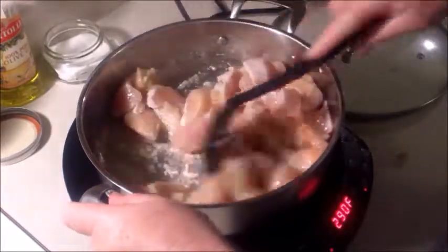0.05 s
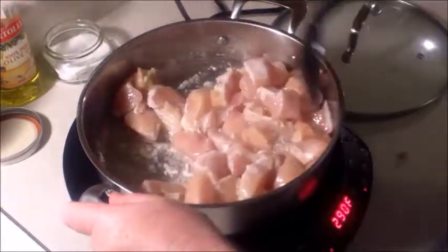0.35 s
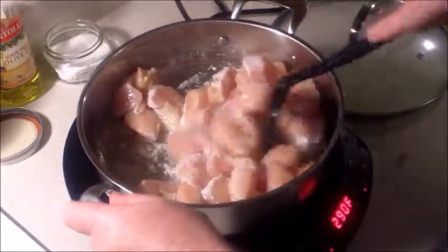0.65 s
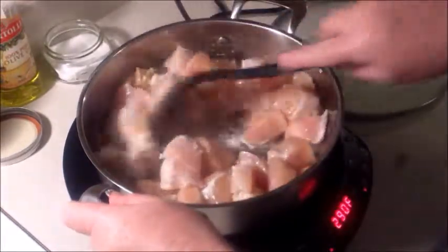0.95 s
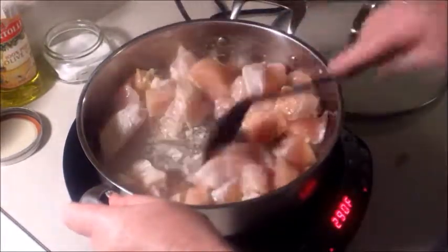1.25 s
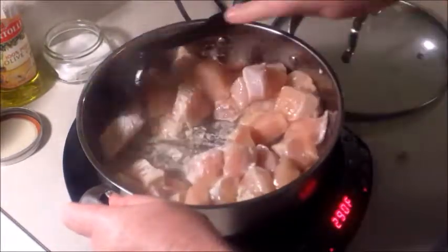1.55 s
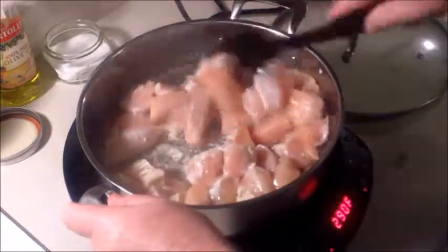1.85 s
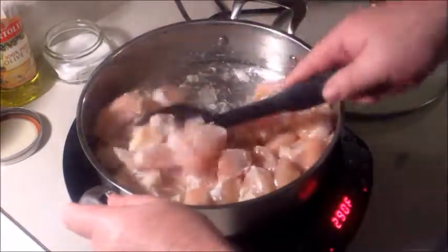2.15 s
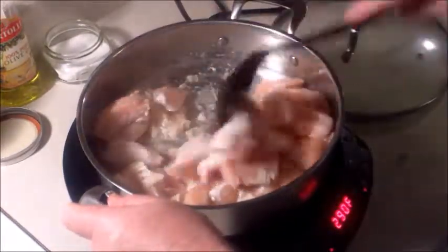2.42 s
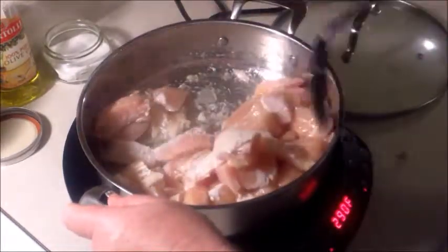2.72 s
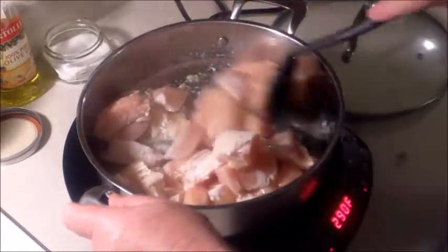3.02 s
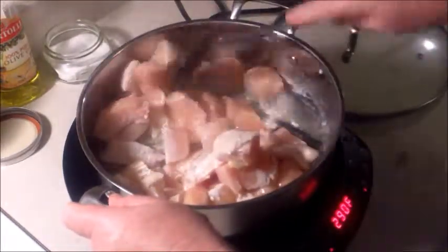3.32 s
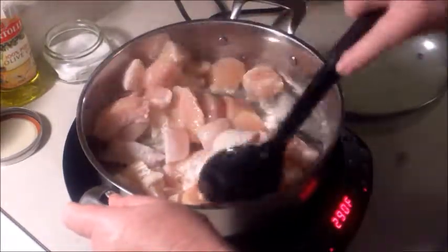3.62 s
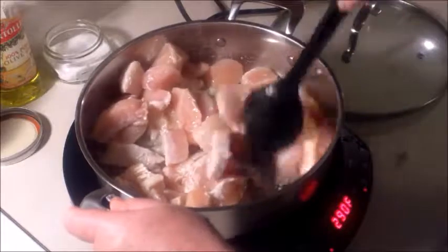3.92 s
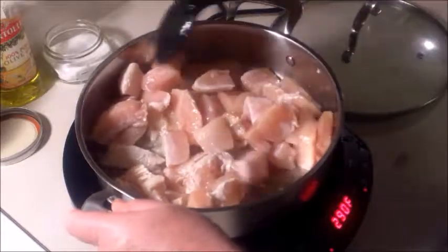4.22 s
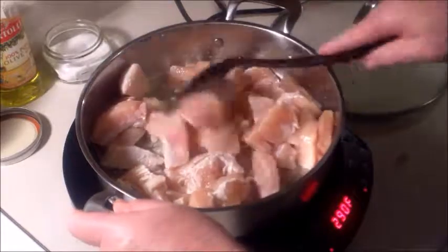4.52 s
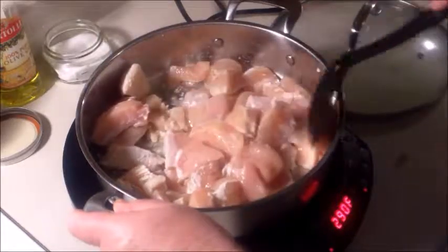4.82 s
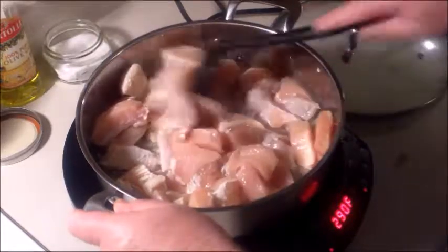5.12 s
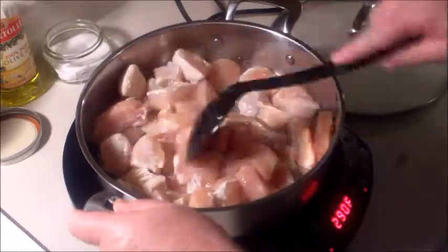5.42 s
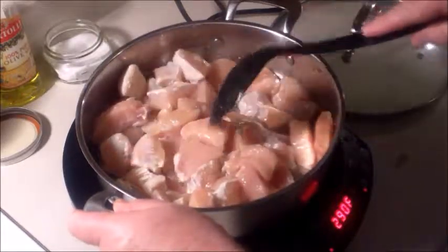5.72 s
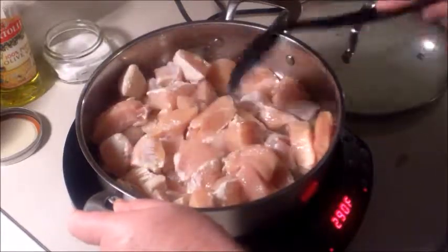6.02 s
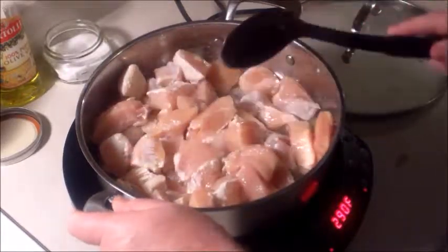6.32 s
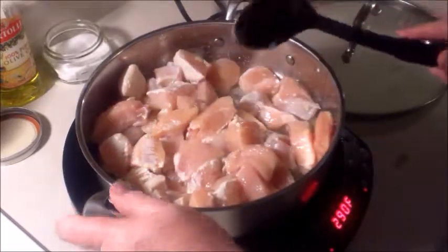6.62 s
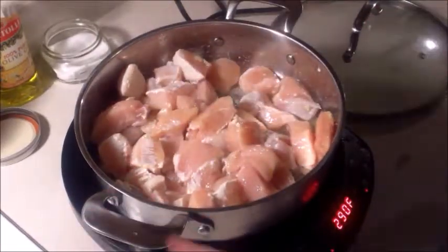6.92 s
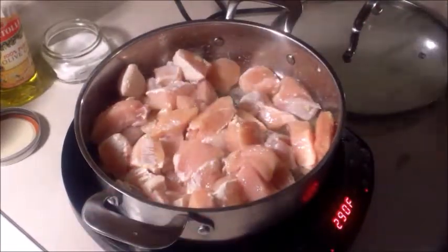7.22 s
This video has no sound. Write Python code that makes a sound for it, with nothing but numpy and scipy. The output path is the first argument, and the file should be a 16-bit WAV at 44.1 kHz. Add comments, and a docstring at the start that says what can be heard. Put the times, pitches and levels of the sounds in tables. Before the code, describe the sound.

Close to a pan in a kitchen, hot oil hisses and crackles around pieces of chicken. Repeated strokes of a plastic spoon make the frying flare and squelch, with soft thuds of meat, occasional taps on the metal and a few sharp spits. A cooktop fan hums faintly below. The sound turns briefly thin and watery at moments, and the sizzle settles a little once the stirring ends.

```python
"""A close, crackling sizzle: diced chicken fries in a steel pan while a plastic spoon turns it over.
Steam bubbles burst in the hot oil and throw a fine spray; each stroke brings wet meat onto the metal,
which sputters. The induction hob's fan and hum lie below, and the kitchen adds faint echoes.
One microphone by the pan, mono; for brief moments the sound turns thin and watery."""
import sys
import numpy as np
from scipy import signal
from scipy.fft import rfft, irfft, next_fast_len
from scipy.io import wavfile
from scipy.ndimage import uniform_filter1d

SR = 44100
rng = np.random.default_rng(int(sys.argv[2]) if len(sys.argv) > 2 else 0)


def unload_audio(sound):
    """Save the sound as a 16-bit wav file, at the path given as the first command line argument."""
    columns = np.transpose(np.atleast_2d(sound))
    # keep every value between -1 and 1, then stretch to whole-number steps
    steps = np.round(np.clip(columns, -1, 1) * 32767)
    wavfile.write(sys.argv[1], SR, steps.astype(np.int16))


N = 320151


def from_db(db):
    """Decibels to gain."""
    return 10 ** (np.asarray(db) / 20)


def rms_one(x):
    """Scale to an rms of 1."""
    return x / np.sqrt(np.mean(x ** 2) + 1e-20)


def in_time(rows):
    """Turn rows of (seconds, values..) into one curve a value, sample by sample."""
    times, *columns = np.transpose(rows)
    return [np.interp(np.arange(N) / SR, times, column) for column in columns]


def drift(rate_hz, step=40, settle=2000):
    """A slow random wander with an rms of about 1."""
    pole = np.exp(-2 * np.pi * rate_hz * step / SR)
    noise = rng.standard_normal(N // step + settle + 2)
    slow = signal.lfilter([1], [1, -2 * pole, pole * pole], noise)[settle:]
    return np.interp(np.arange(N) / step, np.arange(len(slow)), rms_one(slow))


def coloured(x, spectrum):
    """Shape x by rows of (Hz, relative dB); rms 1."""
    size = 2 * next_fast_len(N)
    hz, db = np.transpose(spectrum)
    bin_hz = np.fft.rfftfreq(size, 1 / SR)
    gain = from_db(np.interp(np.log(bin_hz + 1), np.log(hz), db))
    cepstrum = irfft(np.log(gain))[:size // 2]
    cepstrum[1:] *= 2  # minimum phase: nothing rings ahead of a click
    response = np.exp(rfft(cepstrum, size))
    return rms_one(irfft(rfft(x, size) * response)[:N])


def ring(clicks, hz, t60):
    """A unit click starts a sine of height 1 that falls 60 dB in t60 seconds."""
    radius, angle = from_db(-60 / (t60 * SR)), 2 * np.pi * hz / SR
    feedback = [1, -2 * radius * np.cos(angle), radius * radius]
    return signal.lfilter([0, np.sin(angle)], feedback, clicks + 1e-18)


def resonance(x, hz, width_hz, block=256):
    """A steep-sided resonance whose centre may move from block to block; rms 1."""
    radius = np.exp(-np.pi * width_hz / SR)
    cosine = np.cos(2 * np.pi * hz / SR) * np.ones(N)
    out, state = np.zeros(N), np.zeros((2, 2))
    for i in range(0, N, block):
        section = [1, 0, -1, 1, -2 * radius * cosine[i], radius * radius]
        out[i:i + block], state = signal.sosfilt([section, section], x[i:i + block], zi=state)
    return rms_one(out)


def strikes(rows):
    """One click for each (seconds, dB)."""
    out = np.zeros(N)
    for start, db in rows:
        out[round(start * SR)] = from_db(db)
    return out


def bursts(per_s, spread_db, clump_db):
    """Random clicks, many small and a few large; their rate wanders around per_s, so they clump."""
    born = rng.random(N) < per_s * from_db(clump_db * drift(rate_hz=25)) / SR
    sizes = from_db(spread_db * np.minimum(rng.exponential(1, N), 5))
    return born * sizes * rng.choice([-1, 1], N)


def kitchen(x, echo_db=-16, t60=0.4, count=120):
    """Counter, cupboards and walls send faint early echoes back to the microphone."""
    delays = rng.uniform(0.0028, .07, count)
    echoes = np.zeros(SR // 5)
    echoes[(delays * SR).astype(int)] = rng.choice([-1, 1], count) * from_db(-60 * delays / t60)
    return x + from_db(echo_db) * signal.fftconvolve(x, echoes / np.linalg.norm(echoes))[:N]


def hob(air_db=-48, waver_hz=2.0, waver_db=2):
    """Under the pan the cooling fan blows through the housing; motor and mains add wavering tones."""
    # Rush of the fan. Each row: frequency in Hz, relative level in dB.
    fan_colour = [(15, -6), (27, 6.5), (36, -3.5), (55, -7), (100, -12), (160, -10.5), (210, -5.5),
                  (300, -5.5), (470, -11.5), (550, -8), (640, -11.5), (710, -7), (900, -9.5), (1170, -6),
                  (2000, -26.5)]
    # Motor and mains hum. Each row: frequency in Hz, rms level in dB, both before the waver.
    tones = [(59.2, -59.5), (120, -71), (290.7, -58.5), (412, -60), (705.2, -65), (1163, -59.5),
             (1384, -73)]
    out = from_db(air_db) * coloured(rng.standard_normal(N), fan_colour)
    for hz, db in tones:
        phase = 2 * np.pi * np.cumsum(hz + waver_hz * drift(rate_hz=2.74)) / SR
        out += np.sqrt(2) * from_db(db + waver_db * drift(rate_hz=6.1)) * np.sin(phase)
    return out


def drumming(swing_db, rest_db=-51, follows_boil=.5, flop_half_s=0.031):
    """Soft thuds of meat and vapour sound the pan bottom's low note, swelling where a piece flops over."""
    # Meat landing on the pan bottom. Each row: time in seconds, rms level at its height in dB.
    flops = [(.29, -41.5), (.56, -43.5), (1.945, -42.5), (2.02, -43), (2.95, -45), (3.09, -44), (3.6, -45),
             (5.27, -47), (5.76, -45.5), (6.36, -45.5)]
    t = np.arange(N) / SR
    flop_power = sum((from_db(db) * np.exp(-((t - at) / flop_half_s) ** 2)) ** 2 for at, db in flops)
    level = np.sqrt(from_db(rest_db + follows_boil * swing_db) ** 2 + flop_power)
    thuds = bursts(per_s=760, spread_db=2.0, clump_db=1.5)
    return level * resonance(thuds, hz=354, width_hz=127)


def spoon_scrapes(width_hz=850):
    """The spoon's edge slips over the metal in a short rasp that rises in pitch."""
    # Rasps. Each row: start and length in seconds, level in dB, first and last pitch in Hz.
    scrapes = [(1.93, 0.022, -31, 2580, 2800), (4.533, 0.07, -34.5, 2600, 4250)]
    t, out = np.arange(N) / SR, np.zeros(N)
    for start, length, db, start_hz, end_hz in scrapes:
        progress = np.clip((t - start) / length, 0, 1)
        pitch_hz = start_hz + (end_hz - start_hz) * progress
        slips = bursts(per_s=3000, spread_db=1.0, clump_db=1.0)
        out += from_db(db) * np.sin(np.pi * progress) * resonance(slips, pitch_hz, width_hz)
    return out


def spoon_knocks():
    """The spoon knocks on the pan, whose ring the meat damps."""
    # Blows of the spoon. Each row: time in seconds, strength in dB.
    knocks = [(.612, -27), (1.9395, -19.5), (2.5765, -27), (3.7415, -23.5), (4.5585, -25), (4.941, -31)]
    # Modes of the filled pan. Each row: frequency in Hz, gain in dB, t60 in seconds.
    pan_modes = [(406, -28, 0.09), (1280, -34, 0.03), (2170, -19, 0.013), (2760, -2, 0.0093),
                 (3850, 6, 0.0085), (5380, -3, 0.023), (7400, -16, .004)]
    blows = strikes(knocks)
    return sum(from_db(db) * ring(blows, hz, t60) for hz, db, t60 in pan_modes)


def stirring(attack_s=0.029, release_s=0.085, sag_db_per_s=6):
    """Each stroke rises, sags as juice boils off and dies away: power of flare, sputter and squelch."""
    # The spoon pushes wet meat onto hot metal. Each row: start and length in seconds,
    # then the levels of the bubbles' flare, the sputter and the squelch in dB.
    strokes = [(0.0, 0.031, -37.5, -38.5, -46), (0.22, 0.41, -34.5, -62, -48), (1.034, .28, -29, -41, -43),
               (1.403, 0.41, -33.5, -52, -45.5), (1.83, 0.11, -32, -45, -41), (2.013, 0.033, -29, -53, -52),
               (2.58, .18, -65, -45, -70), (2.84, 0.17, -36.5, -39.5, -61), (3.282, .16, -40, -38, -41),
               (3.517, 0.21, -31, -39, -44), (3.773, 0.25, -32, -42, -47), (4.14, 0.088, -41, -44, -54),
               (4.44, .2, -38, -43, -47), (4.85, 0.07, -39, -41, -57), (5.235, 0.16, -35.5, -38, -45.5),
               (5.518, 0.039, -38, -40, -50), (5.811, 0.12, -38.5, -38.5, -51.5),
               (6.147, 0.19, -45, -41.5, -54.5)]
    t, power = np.arange(N) / SR, np.zeros((3, N))
    for start, length, *levels_db in strokes:
        age = np.maximum(t - start, 0)
        push = np.minimum(age / attack_s, 1) * from_db(-sag_db_per_s * (age - length / 2))
        release = np.exp(-np.clip(age - length, 0, 1) / release_s)
        power += (from_db(levels_db)[:, None] * push * release) ** 2
    return power


def juice(swing_db, sputter_power, squelch_power, sputter_rest_db=-40, squelch_rest_db=-55):
    """Larger, wetter bubbles sputter, ring the hollow beside the meat and squelch under the spoon."""
    # The hollow between meat and pan wall.
    # Each row: time in seconds, pitch in Hz, its ring against the sputter in dB.
    hollow_shape = [(0, 2030, -5.5), (1.0, 2060, -7), (1.55, 2150, 0.5), (2.0, 2180, -4.5), (2.3, 2690, -6),
                    (2.9, 2630, -2.5), (3.35, 2150, -4), (4.9, 2260, -12), (5.4, 2160, -6.5),
                    (7.26, 2130, -7.5)]
    hollow_hz, hollow_db = in_time(hollow_shape)
    sputter_hz, squelch_hz = 1.18 * hollow_hz, 0.666 * hollow_hz
    sputter = resonance(bursts(per_s=6000, spread_db=1.0, clump_db=2.6), sputter_hz, width_hz=1700)
    hollow = resonance(bursts(per_s=3000, spread_db=1.5, clump_db=2.5), hollow_hz, width_hz=420)
    squelch = resonance(bursts(per_s=1900, spread_db=1.5, clump_db=3.0), squelch_hz, width_hz=400)
    # between strokes the sputter follows about half of the boil's swing
    sputter_gain = np.sqrt(from_db(sputter_rest_db + 0.48 * swing_db) ** 2 + sputter_power)
    squelch_gain = np.sqrt(from_db(squelch_rest_db) ** 2 + squelch_power)
    return sputter_gain * (sputter + from_db(hollow_db) * hollow) + squelch_gain * squelch


def pops_and_spits():
    """A large bubble rings briefly as it opens; an oil droplet spits with one sharp snap."""
    # Large bubbles. Each row: time in seconds, peak level in dB, pitch in Hz.
    pops = [(2.059, -18, 4930), (3.9005, -20, 4700), (4.001, -19, 4900), (4.5835, -19.5, 4170),
            (6.1744, -27, 4370), (6.5433, -23.5, 4650), (6.847, -24, 4540), (7.192, -28, 4660)]
    # Spitting droplets. Each row: time in seconds, strength in dB.
    spits = [(1.7656, -10.5), (1.7925, -8), (2.061, -10), (3.042, -22), (3.742, -31), (5.305, -26)]
    popping = sum(ring(strikes([(start, db)]), hz, t60=0.036) for start, db, hz in pops)
    return popping + ring(strikes(spits), hz=10500, t60=0.00089)


def frying(boil_db, spray_db, flare_power, flare_spray_db=-6.5):
    """Steam bubbles crackle in the oil, many near one pitch, and their spray hisses above them."""
    # Bubbles of all sizes. Each row: frequency in Hz, relative level in dB.
    bubble_colour = [(500, -25), (1000, -20.5), (1800, -11.5), (2600, -13.5), (3300, -7.5), (3900, -2),
                     (4400, -0.5), (4800, 0.5), (5200, -1.5), (5550, -6.5), (5950, -14.5), (6400, -17),
                     (6800, -12), (8000, -38)]
    # Fine spray. Each row: frequency in Hz, relative level in dB.
    spray_colour = [(5000, -13), (6400, 0.5), (6850, -13), (7200, 2), (8300, 0), (9200, 1.5), (10400, 4.5),
                    (11400, 4), (12300, 1), (14000, 0), (15800, -3)]
    # The commonest bubble size follows the depth of the oil.
    # Each row: time in seconds, its pitch in Hz, its level against the other bubbles in dB.
    bubble_pitch = [(0, 4860, -11), (.4, 4860, -1.5), (1.3, 4750, -8), (2.1, 4850, -5), (3.1, 4400, -5),
                    (3.6, 4580, -9.5), (4.45, 4630, -7), (4.9, 4390, -8.5), (7.26, 4790, -5.5)]
    pitch_hz, alike_db = in_time(bubble_pitch)
    mixed = coloured(bursts(per_s=9000, spread_db=2.5, clump_db=1.6), bubble_colour)
    alike = resonance(bursts(per_s=3700, spread_db=1.5, clump_db=1.2), pitch_hz, width_hz=560)
    spray = coloured(bursts(per_s=20000, spread_db=0.5, clump_db=2.0), spray_colour)
    bubbles = (mixed + from_db(alike_db) * alike) / np.hypot(1, from_db(alike_db))
    bubble_gain = np.sqrt(from_db(boil_db) ** 2 + flare_power)
    spray_gain = np.sqrt(from_db(spray_db) ** 2 + from_db(flare_spray_db) ** 2 * flare_power)
    return bubble_gain * bubbles + spray_gain * spray


def scene():
    """Pan and hob in a kitchen, close to one microphone; the boil and the strokes drive the sizzle."""
    # The boil swells as the meat is spread, then sinks as the pan cools.
    # Each row: time in seconds, level of the bubbles in dB, level of the spray in dB.
    boil = [(0, -30.5, -34.5), (.4, -36, -32), (.95, -31.5, -32), (1.2, -32, -34), (2.15, -30.5, -31.5),
            (2.32, -30.5, -32.5), (2.55, -30, -32.8), (3.0, -28, -31), (3.85, -30, -32.5),
            (4.25, -30, -35.5), (4.7, -32.5, -35), (4.95, -32, -33.5), (5.75, -33, -37.5), (6.5, -33, -38),
            (6.95, -35, -38), (7.06, -38, -39.6), (7.26, -35, -40)]
    boil_db, spray_db = in_time(boil)
    swing_db = boil_db - boil_db.mean()
    flare_power, sputter_power, squelch_power = stirring()
    sizzle = frying(boil_db, spray_db, flare_power) + juice(swing_db, sputter_power, squelch_power)
    pan = sizzle + drumming(swing_db) + pops_and_spits() + spoon_knocks() + spoon_scrapes()
    return np.tile(kitchen(pan) + hob(), (2, 1))


def thinning(x, gate_db=-8, lone_db=5.5, strong_db=6.5, lone_lift_db=5.0, strong_lift_db=1.0):
    """The weakest partials are always gated away; in a dropout only the strongest ones remain."""
    # Thin, watery moments. Each row: centre in seconds, time held at its thinnest in seconds.
    dropouts = [(.030, 0), (.714, 0), (.994, .002), (2.377, 0), (2.889, .004), (2.934, 0), (4.641, 0),
                (4.776, .026), (4.830, 0), (5.034, .020), (5.261, 0), (5.410, .003), (5.449, 0), (5.772, 0),
                (5.812, 0), (5.850, .018), (5.930, .020), (5.965, 0), (6.239, 0), (6.349, .036), (6.455, 0),
                (6.497, 0), (6.602, 0), (6.689, 0), (6.754, 0), (7.028, 0)]
    frame, ramp_s = 2048, 0.025
    partials = signal.stft(x, nperseg=frame)[2]
    power = np.abs(partials) ** 2
    time_smoothed = uniform_filter1d(power, size=21, axis=1)
    band_power = np.abs(uniform_filter1d(time_smoothed, size=9, axis=0)) + 1e-20
    audible = power > from_db(gate_db) ** 2 * band_power
    full = signal.istft(partials * audible, nperseg=frame)[1][:N]
    # partials far above the overall level are spared; lone ones above their own band are lifted and chirp
    strong = power > from_db(strong_db) ** 2 * band_power.mean(axis=0)
    lone = power > from_db(lone_db) ** 2 * band_power
    lift = np.where(lone, from_db(lone_lift_db), from_db(strong_lift_db) * strong)
    watery = signal.istft(partials * lift, nperseg=frame)[1][:N]
    t, opening = np.arange(N) / SR, np.ones(N)
    for centre, held in dropouts:
        dip = np.clip((np.abs(t - centre) - held / 2) / ramp_s, .02, 1)
        opening = np.minimum(opening, dip)
    full_share = np.sin(np.pi / 2 * opening)
    return full_share * full + (1 - full_share) * watery


def record(dry, cutoff_hz=15700):
    """The mono signal is thinned, loses its highest treble and feeds both sides."""
    lowpass = signal.ellip(12, .1, 90, cutoff_hz, fs=SR, output="sos")
    return np.tile(signal.sosfilt(lowpass, thinning(dry.mean(axis=0))), (2, 1))


dry = scene()
out = record(dry)
unload_audio(out)
```